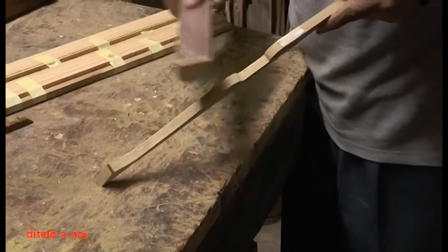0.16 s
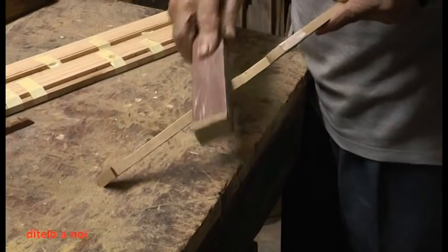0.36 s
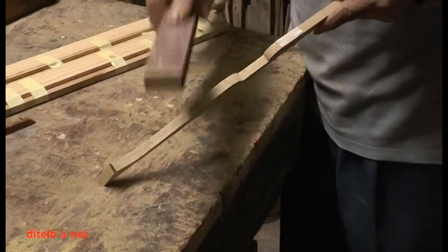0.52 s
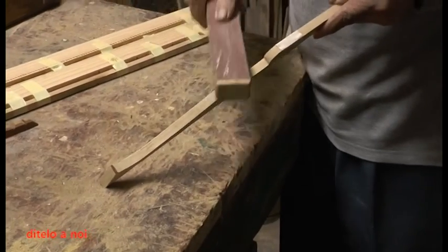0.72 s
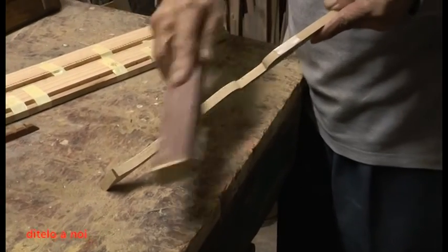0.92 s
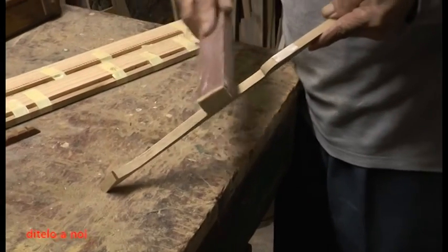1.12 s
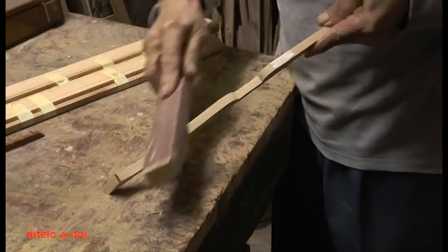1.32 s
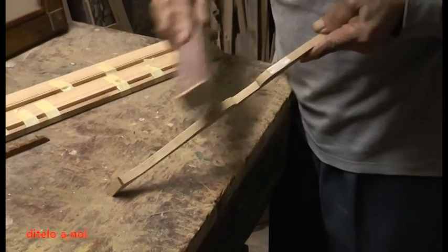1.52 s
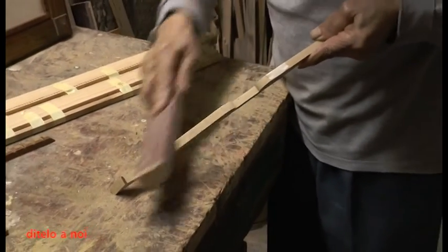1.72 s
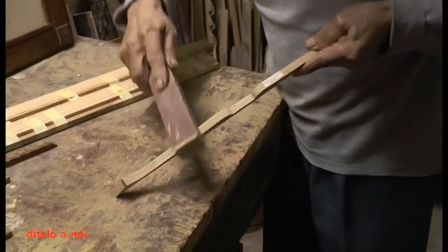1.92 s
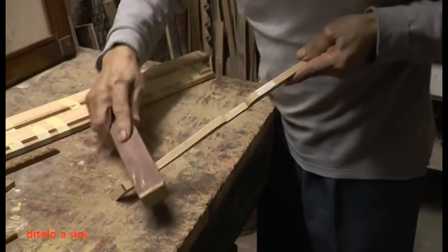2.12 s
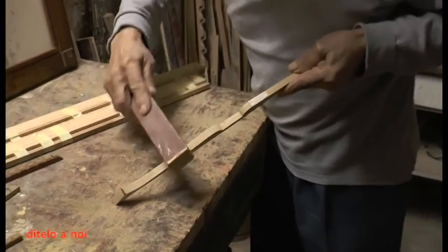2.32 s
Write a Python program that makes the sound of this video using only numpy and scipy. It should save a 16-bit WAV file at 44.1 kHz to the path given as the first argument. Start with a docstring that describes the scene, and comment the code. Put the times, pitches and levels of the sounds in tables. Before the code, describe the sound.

Gritty sandpaper strokes on thin wood, with landing taps and soft bench bumps in a small workshop.

```python
"""A small workshop, in mono: a sanding block is rubbed along a thin wooden strip, its tip on a workbench.
Three separate strokes, each a landing tap and a swelling rasp, then four joined strokes back and forth.
Filtered showers of grit make the hiss, shake strip and bench, and swell in narrow or broad bands of pitch.
Damped modes make the dull bumps on the bench. Short reflections and quiet room noise lie behind."""
import sys
import numpy as np
from scipy import signal
from scipy.fft import rfft, irfft, next_fast_len
from scipy.io import wavfile
from scipy.ndimage import uniform_filter1d, map_coordinates

SR = 44100
rng = np.random.default_rng(int(sys.argv[2]) if len(sys.argv) > 2 else 0)


def to_wav(s):
    """Save 16-bit WAV."""
    ch = np.atleast_2d(s).T  # columns
    pcm = np.round(np.clip(ch, -1, 1) * 32767)  # PCM
    wavfile.write(sys.argv[1], SR, pcm.astype(np.int16))


N = 103679
T = np.arange(N) / SR  # s

# Loudness curve of the rasp, one list per stroke, before the overall STROKES_DB: time_s, level_db
STROKE_CURVES = [
    [(0.245, -33.5), (0.299, -22), (0.387, -22.5), (0.435, -28.5), (0.47, -42.5)],
    [(0.715, -32.5), (0.739, -32), (0.751, -27), (0.807, -22.5), (0.911, -27), (0.999, -55), (1.01, -50)],
    [(1.165, -38), (1.185, -38.5), (1.261, -20.5), (1.343, -24), (1.425, -46), (1.45, -58)],
    [(1.64, -29), (1.69, -19), (1.78, -24.5), (1.82, -38.5)],
    [(1.82, -32.5), (1.848, -23.5), (1.948, -21), (2.0, -27.5)],
    [(2.0, -30), (2.064, -17.5), (2.2, -29.5)],
    [(2.2, -25.5), (2.286, -20), (2.318, -21), (2.345, -24.5)],
]
# Tone of each stroke: fizz_db (over the rasp, at its loudest), rasp_tilt_db_per_octave,
# body_db (wood over the rasp, mid-stroke), body_growth_db_per_s, bench_db (over the body)
STROKE_TONES = [(-12, -1.5, -6, 34, -24), (-9.5, -4, -2.5, -5, -17), (-4, -2.5, -9, 51, -19.5),
                (-2, 0, -9.5, 25, -8.5), (-8.5, -1, -15, 28, -8), (-4, 0.5, -8, 70, -11.5),
                (-4, -2.5, -11.5, 7, -10.5)]
# Swells of coloured grit: strip resonances, a broad soft knock at 2.12 s,
# a bright surge of the last stroke at 2.292 s:
# centre_s, half_length_s (to 1/e), pitch_hz, width_hz, level_db
GRIT_SWELLS = [(0.314, 0.032, 2680, 160, -30.5), (0.329, 0.042, 3240, 55.56, -29.5),
               (0.389, 0.036, 1870, 240, -22.5), (0.378, 0.058, 2550, 216, -28.5),
               (0.502, 0.075, 4990, 450, -43.5), (0.87, 0.058, 580, 58.4, -27),
               (0.849, 0.063, 734, 130, -34.5), (0.861, .04, 1864, 211, -25),
               (0.926, 0.0136, 2480, 200, -32), (0.937, 0.047, 365, 252, -37),
               (1.267, 0.02, 4300, 300, -26.5), (1.314, 0.027, 890, 350, -32),
               (1.486, 0.013, 5060, 200, -36.5), (1.67, 0.03, 3600, 200, -26), (1.78, 0.01, 3903, 120, -27),
               (1.936, 0.059, 3800, 169, -27), (1.89, 0.083, 1230, 108, -36.5),
               (2.12, 0.017, 930, 705, -25), (2.13, 0.016, 291, 40, -27), (2.19, 0.091, 2050, 613, -32),
               (2.277, 0.0283, 3900, 100, -27.5), (2.292, 0.0205, 4460, 900, -23.5)]
# The block lands on the strip: start_s, scratch_db, knock_db, thud_db, ring_hz, ring_db
BLOCK_LANDINGS = [(0.2298, -24.5, -37.5, -41, 1000, -40.5), (.690, -24, -22, -35.5, 1090, -26.5),
                  (1.141, -23.5, -32, -34, 4030, -29), (1.6152, -20, -20, -26.5, 1060, -29)]
# The strip bumps on the bench: start_s, pitch_hz, level_db
BENCH_BUMPS = [(0.201, 250, -39.5), (1.147, 325, -36), (1.621, 425, -27), (1.791, 140, -34),
               (1.96, 425, -22.5), (2.144, 161, -27)]
# Damped modes of a bump: frequency_ratio (over the pitch), level_db
BUMP_PARTIALS = [(.62, -16), (1, -2), (1.4, -6), (2.3, -32)]
# The paper grazes the strip: start_s, level_db, fall_db_per_s, tilt_db_per_octave
PAPER_GRAZES = [(0, -39.5, 70, -2), (.45, -35, 76, -1), (1.411, -43, 11, 0), (1.475, -35, 71, 2.5)]
# The paper's edge catches: start_s, level_db
EDGE_TICKS = [(.068, -37), (0.497, -26.5), (1.473, -30), (1.503, -29)]

# Colours of the noises, relative and before any tilt: frequency_hz, level_db (per Hz)
RASP_SPECTRUM = [(700, -30), (1400, -14), (2200, -3.5), (3000, -1.5), (3800, 0.5), (5200, -4.5),
                 (7300, -5.5), (8300, -12.5), (11000, -24), (15000, -36)]  # grit on wood
FIZZ_SPECTRUM = [(3000, -27), (5500, 0.5), (7800, 2.5), (10000, -2.5), (13000, -7.5), (15000, -30)]  # high hiss of the grit
WOOD_SPECTRUM = [(80, -45), (140, -9), (220, -6), (380, -3.5), (520, -2), (700, 0), (880, -3), (1200, -4),
                 (1700, -4), (2600, -18), (6000, -56)]  # shaken body of the strip
BENCH_SPECTRUM = [(30, -24), (70, -3), (150, 0), (400, -12), (1200, -45)]  # shaken bench
SCRATCH_SPECTRUM = [(700, -25), (1500, -10), (2300, -3), (3100, -3), (3900, 2), (4800, -5), (7000, -7),
                    (9000, -14), (15000, -26)]  # paper, as the block lands
KNOCK_SPECTRUM = [(150, -37), (400, -2), (620, 1.5), (850, -9), (1080, 2.5), (1500, -2.5), (2300, -2),
                  (4000, -22), (9000, -52)]  # strip, as the block lands
THUD_SPECTRUM = [(40, -28), (85, -2), (200, -3.5), (420, -1), (700, -19), (2000, -50)]  # bench, as the block lands
GRAZE_SPECTRUM = [(150, -3), (400, -1.5), (700, 2.5), (950, -4), (1300, -2), (1570, 0), (1900, 1),
                  (2550, 2), (3100, 0), (4500, 0.5), (5050, -4), (5700, -3), (7200, -5.5), (10000, -12),
                  (15000, -29)]  # light brushing, and the ticks
AIR_SPECTRUM = [(25, 3), (45, 4), (80, 2), (160, 0.5), (260, -3), (380, 5.5), (600, -4), (1000, -7),
                (2500, -14), (6000, -18), (12000, -18.5), (15000, -48)]  # quiet of the workshop

STROKES_DB = -0.4  # overall level of the strokes
BRIGHTEN = 0.66  # extra dB of fizz per dB of rasp
TURN_S = 0.013  # time for the paper to bite or let go
GRIT_PER_S = 30000  # grains that catch
UNEVEN_DB, UNEVEN_PER_S = 0.47, 90  # flutter of the pressure: depth, knots a second
PATCH_DB, PATCH_HZ, PATCH_S = 2.4, 284.4, 0.025  # colour patches: rms depth, rough width and life
WANDER, WANDER_PER_S = 0.01822, 45  # relative drift of a swell's pitch, knots a second
SEAT_S, EDGE_DB = 0.006, -0.5  # delay from edge to face, level of the edge against the face
TAP_RISE_S = 0.0019  # time constant of a tap's rise
SCRATCH_T60, KNOCK_T60, THUD_T60, TICK_T60 = 0.053, 0.073, 0.2, 0.061  # s to fall 60 dB
RING_WIDTH_HZ = 180  # of the resonance that a landing excites most
BUMP_RISE_S = 0.0038  # a soft contact: the envelope peaks this long after the touch
SKIP_DB, SKIP_PER_S = 0.7, 75  # a light block skips over the wood: depth, knots a second
ROOM_T60, ROOM_DB, WALL_S = 0.11, -8, 0.0049  # decay s, level against the work, first reflection s
AIR_DB = -49.5
LOW_CUT_HZ, TOP_HZ = 73, 14900  # band of the microphone
STFT_SIZE = 512  # samples, with a hop of half


def strokes():
    """Grit rasps, fizzes most where the rasp is loudest, and shakes strip and bench along the way."""
    out = np.zeros(N)
    for curve, tone in zip(STROKE_CURVES, STROKE_TONES):
        times, levels = np.transpose(curve)
        fizz_db, tilt, body_db, body_growth, bench_db = tone
        first, last = times[0], times[-1]
        rasp_db = np.interp(T, times, levels)
        from_middle = np.clip(T, first, last) - (first + last) / 2
        inside = np.minimum(T - first, last - T)
        # square-root ramps keep the power steady where joined strokes cross
        contact = np.sqrt(np.clip(inside / TURN_S + 0.5, 0, 1))
        rasp = patchy(scrape(RASP_SPECTRUM, tilt))
        fizz = amp(fizz_db + BRIGHTEN * (rasp_db - levels.max())) * scrape(FIZZ_SPECTRUM)
        shaken = scrape(WOOD_SPECTRUM) + amp(bench_db) * scrape(BENCH_SPECTRUM)
        body = amp(body_db + body_growth * from_middle) * shaken
        out += contact * amp(rasp_db + STROKES_DB) * (rasp + fizz + body)
    return out * amp(UNEVEN_DB * wobble(UNEVEN_PER_S))


def swells():
    """Grit coloured by one narrow or broad peak swells, drifts in pitch and fades."""
    out = np.zeros(N)
    for centre, half, hz, width, db in GRIT_SWELLS:
        near = np.abs(T - centre) < 3 * half
        # reading the coloured grit at a wandering speed bends its pitch
        drift = np.cumsum(WANDER * wobble(WANDER_PER_S)[near])
        places = np.flatnonzero(near) + drift
        coloured = map_coordinates(resonance(hz, width), [places], mode="nearest")
        envelope = np.exp(-((T[near] - centre) / half) ** 2)
        out[near] += amp(db) * envelope * coloured
    return out


def landings():
    """Edge, then face of the block meet the strip: scratch, ringing wooden knock and thud in the bench."""
    out = np.zeros(N)
    for start, scratch_db, knock_db, thud_db, ring_hz, ring_db in BLOCK_LANDINGS:
        scratch = amp(scratch_db) * scrape(SCRATCH_SPECTRUM)
        knock = amp(knock_db) * scrape(KNOCK_SPECTRUM)
        ring = amp(ring_db) * resonance(ring_hz, RING_WIDTH_HZ)
        thud = amp(thud_db) * scrape(THUD_SPECTRUM)
        out += edge_and_face(start, SCRATCH_T60) * scratch
        out += edge_and_face(start, KNOCK_T60) * (knock + ring)
        out += blow(start + SEAT_S, THUD_T60) * thud  # the face alone
    return out


def edge_and_face(start, t60):
    """Envelope of two close touches, the edge a little softer than the face."""
    return amp(EDGE_DB) * blow(start, t60) + blow(start + SEAT_S, t60)


def blow(start, t60):
    """Envelope of one touch: quick rise and exponential decay."""
    age = np.maximum(T - start, 0)
    return (1 - np.exp(-age / TAP_RISE_S)) * np.exp(-np.log(1000) * age / t60)


def bumps():
    """Dull knocks of the flexing strip on the bench, each a few damped modes of random phase."""
    out = np.zeros(N)
    for start, hz, db in BENCH_BUMPS:
        age = np.maximum(T - start, 0)
        ring = np.zeros(N)
        for ratio, mode_db in BUMP_PARTIALS:
            ring += amp(mode_db) * np.sin(2 * np.pi * (ratio * hz * age + rng.random()))
        envelope = age / BUMP_RISE_S * np.exp(1 - age / BUMP_RISE_S)  # peaks at 1
        out += amp(db) * envelope * ring
    return out


def grazes():
    """Light, skipping contact that starts at once and fades, with ticks where the paper's edge catches."""
    brush, ticks = np.zeros(N), np.zeros(N)
    for start, db, fall, tilt in PAPER_GRAZES:
        level = amp(db - fall * np.maximum(T - start, 0)) * (T >= start)
        brush += level * patchy(scrape(GRAZE_SPECTRUM, tilt))
    for start, db in EDGE_TICKS:
        ticks += amp(db) * blow(start, TICK_T60) * scrape(GRAZE_SPECTRUM, tilt=1.5)
    return brush * amp(SKIP_DB * wobble(SKIP_PER_S)) + ticks


def workshop(x):
    """Short, dense reflections from bench and walls: decaying noise that begins at the first reflection."""
    t = T[:SR // 2]
    decay = np.exp(-np.log(1000) * t / ROOM_T60)
    tail = rng.standard_normal(len(t)) * decay * (t > WALL_S)
    return signal.fftconvolve(x, tail / np.linalg.norm(tail))[:N]


def air():
    """Quiet of the workshop: steady coloured noise."""
    return amp(AIR_DB) * scrape(AIR_SPECTRUM)


def grit():
    """A dense shower of tiny impulses, one for each grain that catches."""
    return rng.standard_normal(N) * (rng.random(N) < GRIT_PER_S / SR)


def scrape(spectrum, tilt=0):
    """Grit of rms 1 coloured by a spectrum and a tilt in dB per octave."""
    f, db = np.transpose(spectrum)

    def colour(hz):
        curve_db = np.interp(np.log(hz), np.log(f), db)
        tilt_db = tilt * np.log2(np.clip(hz, f[0], f[-1]))
        bass_fall = np.minimum(hz / f[0], 1) ** 2  # 12 dB per octave below the first point
        return amp(curve_db + tilt_db) * bass_fall

    return unit(filtered(grit(), colour))


def resonance(centre_hz, width_hz):
    """Grit of rms 1 coloured by one resonant peak, about width_hz wide at half amplitude."""
    def peak(hz):
        detuning = (hz ** 2 - centre_hz ** 2) / (1.01 * hz * width_hz)
        return 1 / (1 + detuning ** 2)

    return unit(filtered(grit(), peak))


def patchy(x):
    """Random patches of gain in time and pitch, as ever-changing parts of the paper bite; rms 1."""
    z = signal.stft(x, nperseg=STFT_SIZE)[2]
    bins = max(1, round(PATCH_HZ * STFT_SIZE / SR))
    frames = max(1, round(PATCH_S * SR / (STFT_SIZE // 2)))
    field = uniform_filter1d(rng.standard_normal(z.shape), bins, axis=0)
    field = uniform_filter1d(field, frames, axis=1)
    shaded = signal.istft(z * amp(PATCH_DB * unit(field)), nperseg=STFT_SIZE)[1]
    return unit(shaded[:N])


def wobble(rate):
    """A smooth random curve, rate knots a second."""
    return map_coordinates(rng.standard_normal(N // 20), [T * rate], mode="wrap")


def filtered(x, response):
    """x shaped by a response of frequency, without phase shift."""
    m = next_fast_len(N + 8192)
    hz = np.fft.rfftfreq(m, 1 / SR) + 1e-3  # kept above zero for the logarithms
    return irfft(rfft(x, m) * response(hz), m)[..., :N]


def unit(x):
    """x scaled to rms 1."""
    return x / np.sqrt(np.mean(x ** 2) + 1e-20)


def amp(db):
    """Amplitude factor of a level in dB."""
    return 10 ** (np.asarray(db) / 20)


def scene():
    """The work, its reflections and the air of the room, alike in both channels."""
    work = strokes() + swells() + landings() + bumps() + grazes()
    mono = work + amp(ROOM_DB) * workshop(work) + air()
    return np.array([mono, mono])


def record(dry):
    """The microphone thins the deep bass and keeps nothing above its band limit."""
    low_cut = signal.butter(2, LOW_CUT_HZ, "high", fs=SR, output="sos")
    thinned = signal.sosfilt(low_cut, dry)
    return filtered(thinned, lambda hz: hz < TOP_HZ)


dry = scene()
out = record(dry)
to_wav(out)
```